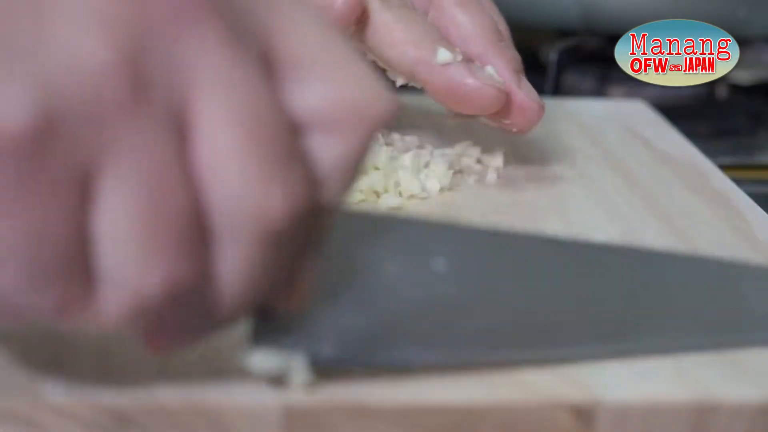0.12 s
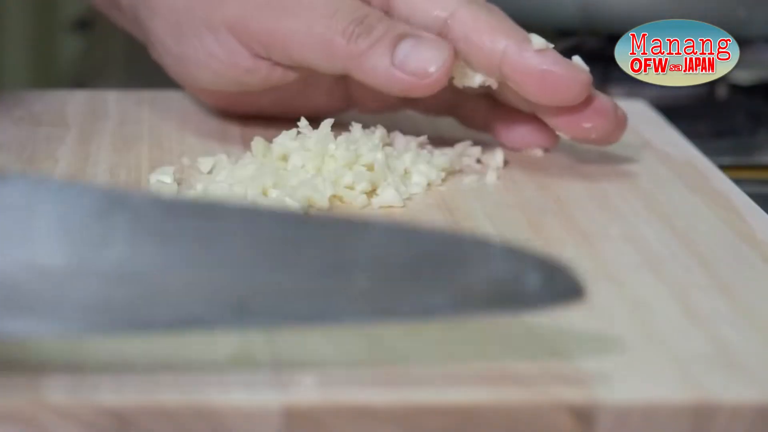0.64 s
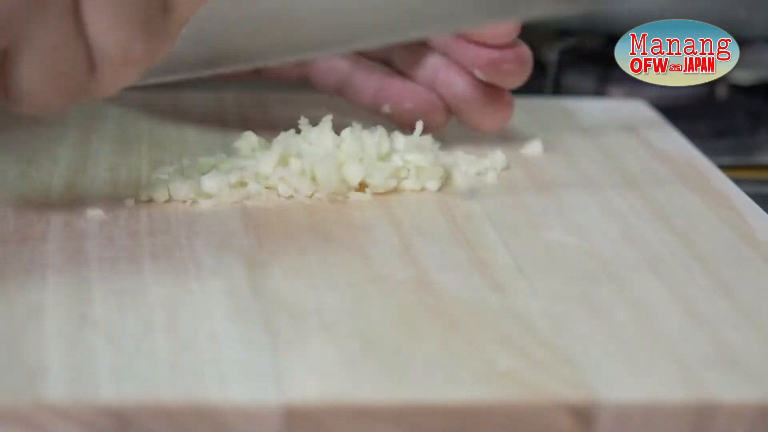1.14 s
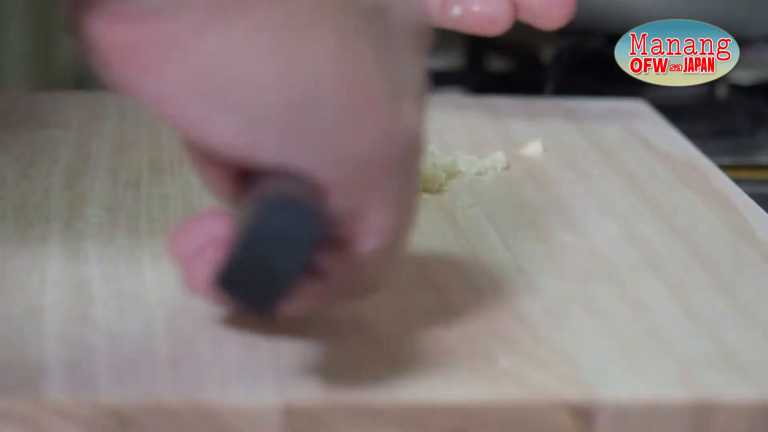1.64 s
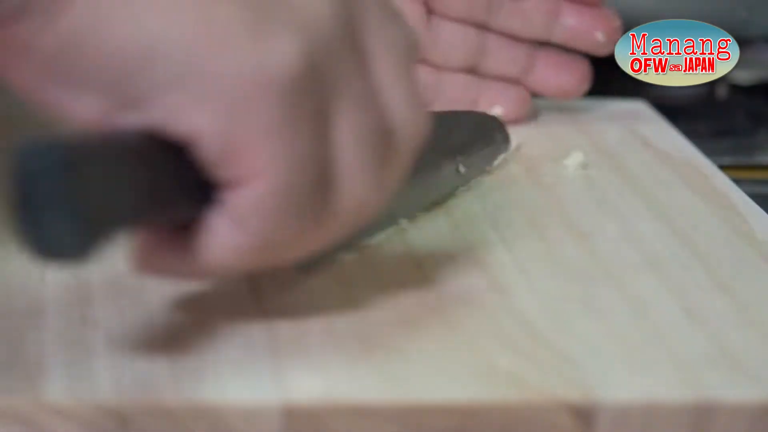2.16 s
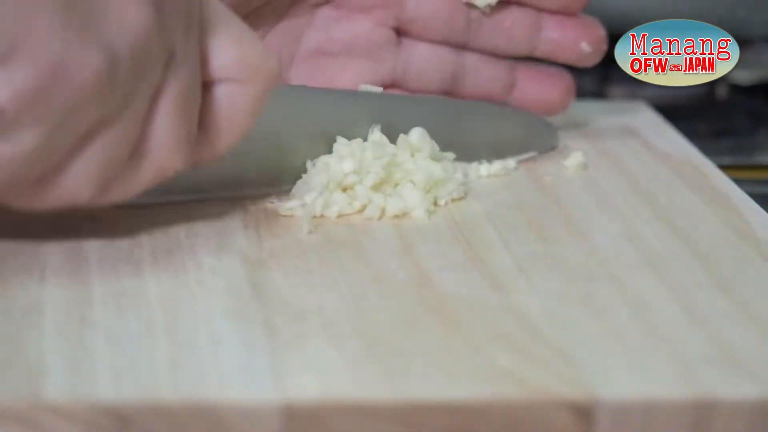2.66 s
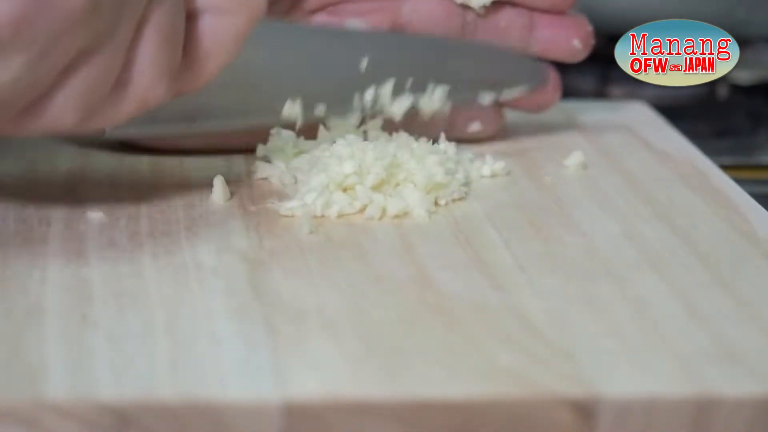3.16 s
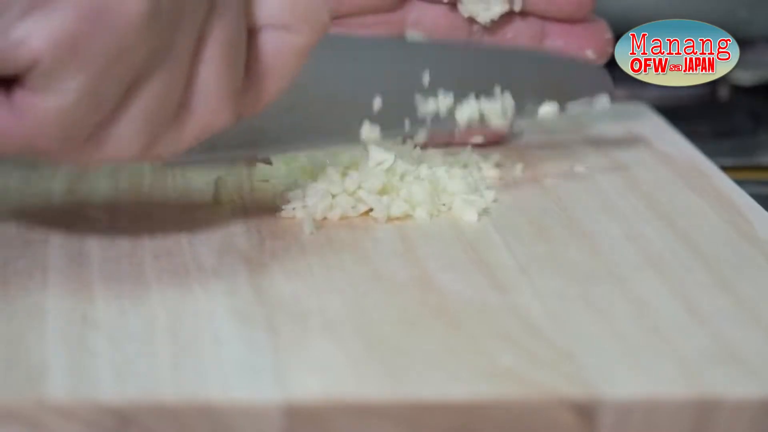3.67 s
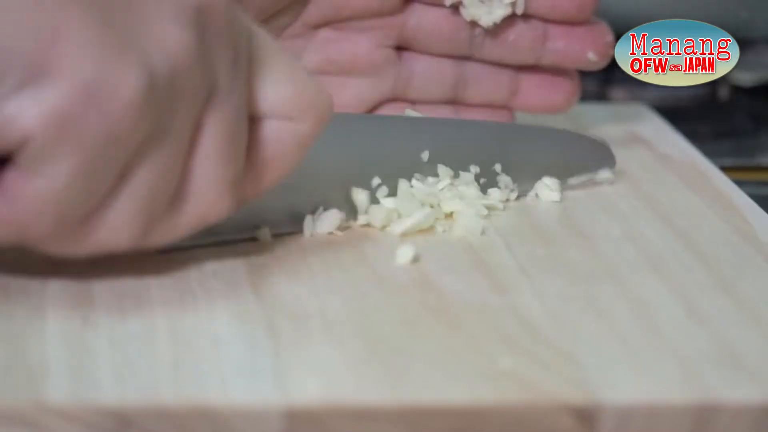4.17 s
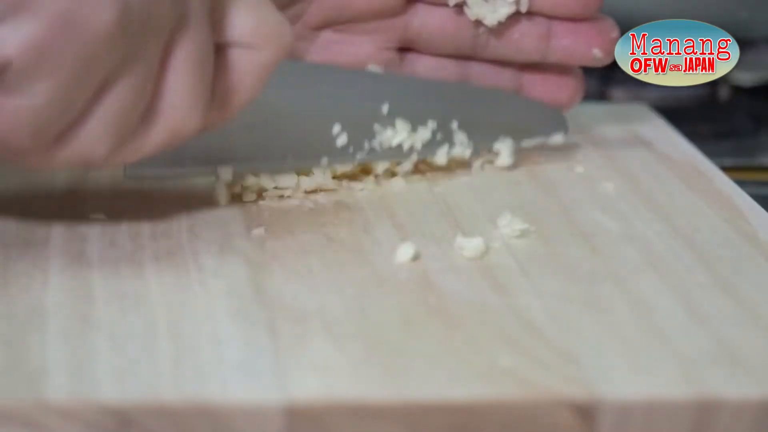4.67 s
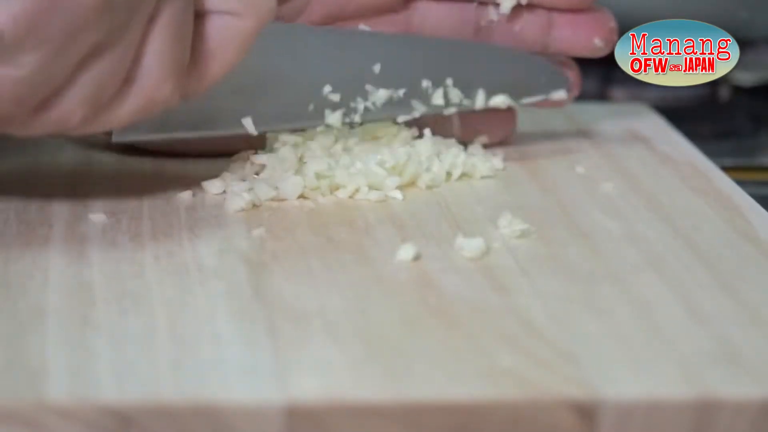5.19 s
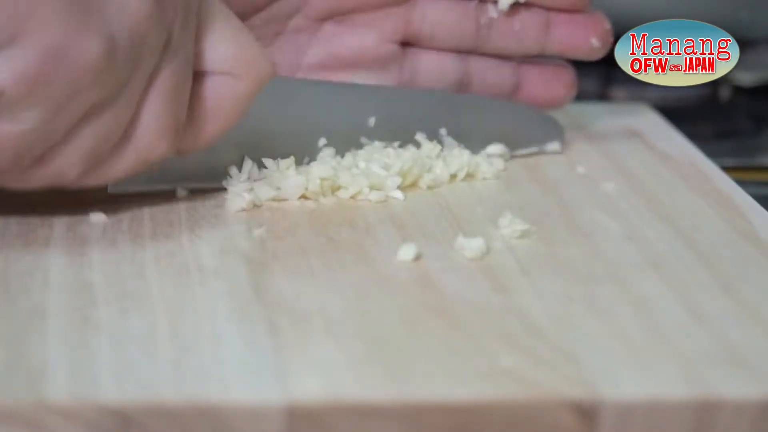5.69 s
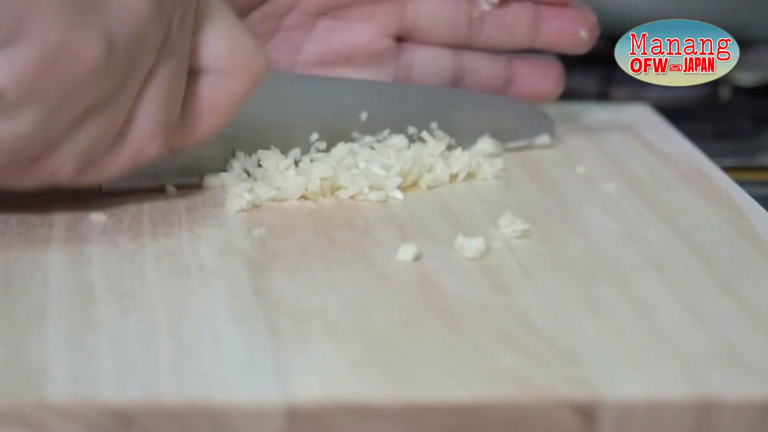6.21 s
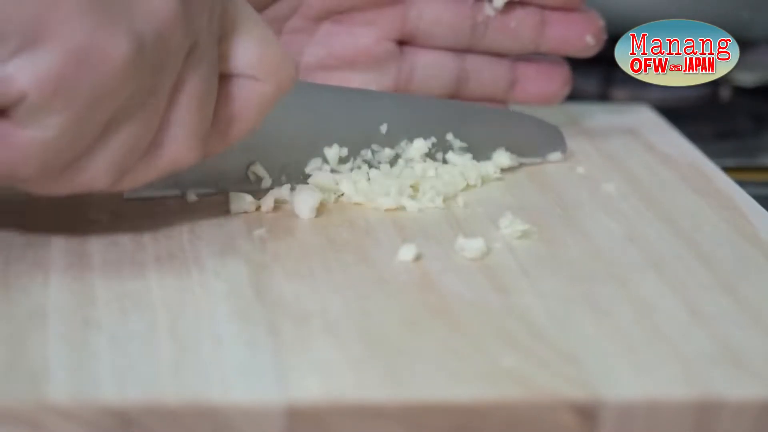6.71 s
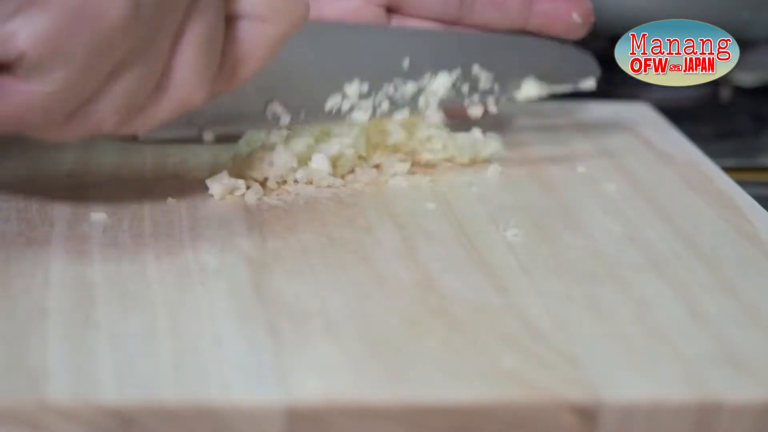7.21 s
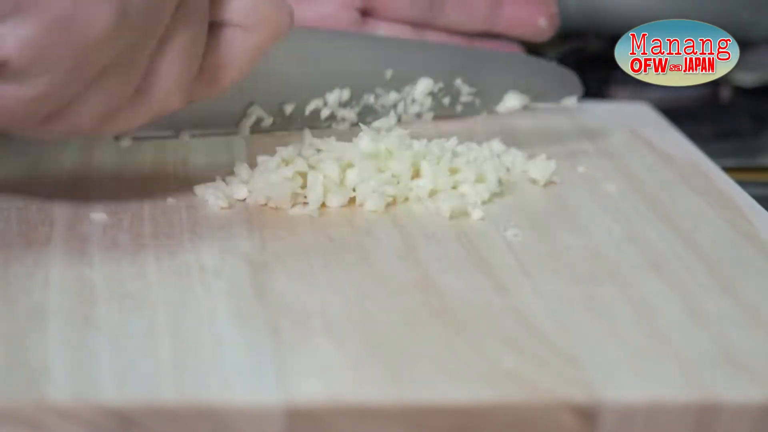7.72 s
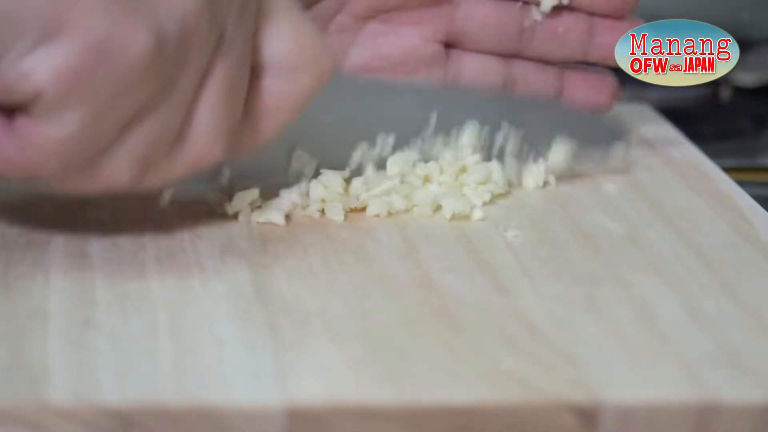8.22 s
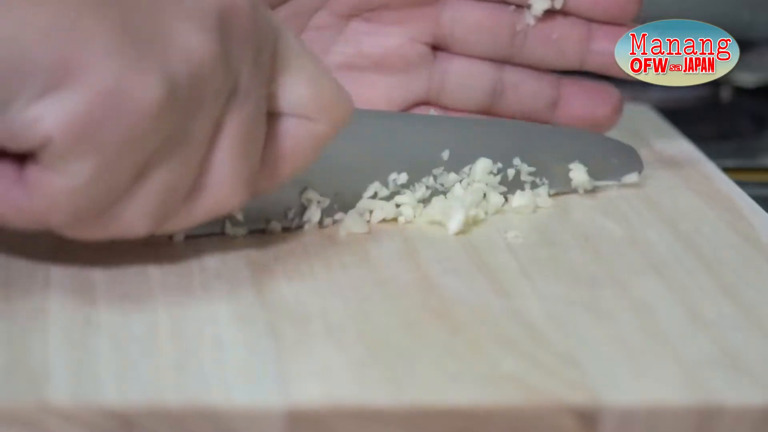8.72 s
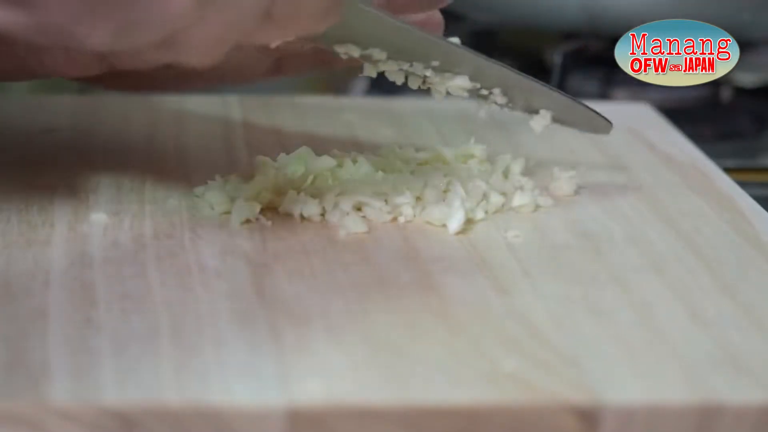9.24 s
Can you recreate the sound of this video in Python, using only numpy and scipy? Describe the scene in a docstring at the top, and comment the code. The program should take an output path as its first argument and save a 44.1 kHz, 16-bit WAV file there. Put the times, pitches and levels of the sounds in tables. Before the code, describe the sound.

Close up in a small hard kitchen, slightly right in the stereo image, a steel knife minces garlic on a thick wooden board. At about 0.15 and 0.8 seconds a moderate knock leads into a long rasping scrape of the edge along the wood. Firmer taps with brief scrapes come at 1.5 and 2.1. From 2.6 chopping runs at four to five strokes a second, each a short gritty slide with a woody knock; sharp loud ones land near 3.05, 3.5 and 3.75. After 4.2 there is a short break with a scrape at 4.5, then brisk chops from 4.9 to 6.65, several hard and bright. Knocks with soft gathering scrapes fall at 7.0 and 7.5. Chopping resumes from 7.9 to 8.8, mostly lighter, with one strong hit near 8.1. Then only quiet hiss and a faint, thin wavering appliance whine remain, present throughout.

```python
"""Mincing garlic on a wooden board

A steel kitchen knife minces garlic on a thick wooden board in a small hard kitchen, heard close up in stereo.
Each chop is a short slide of the edge (noise of tiny slips through blade and board rings) and a knock on
the wood (damped swings that ring the board); longer scrapes of the same slips gather the heap.
An appliance hums faintly behind it all in thin wavering sines, over a bed of shaped noise."""
import sys
import numpy as np
from scipy import signal
from scipy.fft import rfft, irfft, next_fast_len
from scipy.io import wavfile
from scipy.ndimage import uniform_filter1d

SR = 44100
rng = np.random.default_rng(int(sys.argv[2]) if len(sys.argv) > 2 else 0)


def dump(signal):
    """Clip the signal to [-1, 1] and save it as 16-bit WAV at the path in sys.argv[1]."""
    limited = np.clip(np.atleast_2d(signal).T, -1, 1)
    pcm = np.round(limited * 32767).astype(np.int16)
    wavfile.write(sys.argv[1], SR, pcm)


def magnitude_from_level(level_db):
    """Linear magnitude for a level in decibels (20 dB per decade)."""
    exponent = np.asarray(level_db, float) / 20
    return 10 ** exponent


N = 412775


def evened(x):
    """Scales to rms 1."""
    return x / np.sqrt(np.mean(x ** 2) + 1e-20)


def read(points, hz):
    """Reads a table on a log-frequency axis."""
    f, value = np.transpose(points)
    return np.interp(np.log(hz + 1), np.log(f + 1), value)


def add(mix, s, sound):
    """Mixes a stereo sound in at s seconds."""
    part = mix[:, round(s * SR):][:, :sound.shape[1]]
    part += sound[:, :part.shape[1]]


def noise_pair(count, size, likeness, shape_db):
    """Stereo noise from random short-time spectra; shape_db(hz, s) gives the level of each cell."""
    hz, hop = np.fft.rfftfreq(size, 1 / SR), size // 4
    frames = count // hop + 5
    a, b, c, d = rng.standard_normal((frames, len(hz), 4)).T
    same = np.clip(read(likeness, hz), -1, 1)[:, None]
    left = a + 1j * b
    right = same * left + np.sqrt(1 - same ** 2) * (c + 1j * d)
    cells = np.array([left, right])
    cells *= magnitude_from_level(shape_db(hz[:, None], np.arange(frames) * hop / SR))
    return signal.istft(cells, nperseg=size, noverlap=size - hop)[1][:, :count]


# spectral shape of the room tone: (frequency [Hz], relative density [dB per Hz])
ROOM_COLOUR = [(25, -28), (50, -21), (80, -22), (190, -17.5), (300, -20.5), (450, -20), (800, -22),
               (1100, -23.5), (1650, -25), (2100, -32.5), (2700, -27.5), (4500, -34), (5200, -41.5),
               (9000, -38), (15500, -45)]
# stereo width of the room tone: (frequency [Hz], left-right likeness [0 to 1])
ROOM_LIKENESS = [(60, 0.98), (290, 0.47), (640, 0.6), (1400, 0.08), (3000, 0.0082)]
# whine of the appliance: (frequency [Hz], relative level [dB])
APPLIANCE_TONES = [(710.6, -67), (882.9, -68.5), (931.3, -62), (1421, -75), (1663, -70.5), (2449, -86),
                   (2692, -80)]


def room_tone():
    """Smooth air and microphone hiss with a few thin tones that waver in level and phase."""
    colour = lambda hz, s: read(ROOM_COLOUR, hz) + 0 * s
    air = noise_pair(count=N, size=2048, likeness=ROOM_LIKENESS, shape_db=colour)
    tone = magnitude_from_level(-50.5) * evened(air)
    t = np.arange(N) / SR
    for hz, db in APPLIANCE_TONES:
        waver = evened(uniform_filter1d(rng.standard_normal((N, 2)), 3000, axis=0)).T
        level = magnitude_from_level(db + 6 + 1.8 * waver[0])
        tone += level * np.sin(2 * np.pi * hz * t + 0.52 * waver[1])
    return tone


# how long the echoes hang on: (frequency [Hz], t60 [s], held within 0.05 to 0.35)
ECHO_DECAY = [(100, 0.59), (350, 0.21), (700, 0.23), (1840, 0.23), (4000, 0.23), (7000, 0.24),
              (14000, 0.17)]
# stereo width of the echoes: (frequency [Hz], left-right likeness [0 to 1])
ECHO_LIKENESS = [(100, 1), (640, 0.91), (1400, 0.72), (3000, 0.1), (6000, 0.036)]


def kitchen(x, wet_db):
    """Direct sound, a gap, then lumpy echoes that die by band; each touch draws its own echoes."""
    t = np.arange(SR // 3) / SR
    dying = lambda hz, s: -60 * s / np.clip(read(ECHO_DECAY, hz), .05, .35)
    tail = noise_pair(count=len(t), size=256, likeness=ECHO_LIKENESS, shape_db=dying)
    lumps = evened(uniform_filter1d(rng.standard_normal(len(t)), 40))  # near walls arrive as separate slaps
    tail *= magnitude_from_level(9.0 * np.clip(lumps, -2, 1.1) * np.exp(-t / 0.01))
    gap = SR // 280  # samples
    tail = np.pad(tail / np.linalg.norm(tail[0]), ((0, 0), (gap, 0)))
    out = magnitude_from_level(wet_db) * signal.fftconvolve(x[None], tail, axes=1)
    lag = rng.integers(-2, 4)  # samples between the two microphones
    out[0, :len(x)] += np.roll(x, lag)
    out[1, :len(x)] += x
    return out


# ringing modes of the board: (frequency [Hz], relative level before scatter [dB], t60 before the limit [s])
BOARD_MODES = [(218.7, 7, 0.13), (338.6, -2, 0.22), (485.5, 6, 0.048), (643, -5, 0.03),
               (808.5, 13.5, 0.014), (950, -6.5, 0.06), (1113, -2.5, .06), (1401, -6.5, .06),
               (1537, 2.5, .06), (1630, 9, 0.016)]


def board(x):
    """Damped sine modes of the wood, each weighted a little differently at every touch."""
    hz, db, t60 = np.array(BOARD_MODES).T[:, :, None]
    t = np.arange(SR // 4) / SR
    db = db + 3 * rng.standard_normal(db.shape)
    longest = np.clip(60 / hz, .05, .3)  # s; wood damps its high modes fast
    fall_db = db - 60 * t / np.minimum(t60, longest)
    ring = (magnitude_from_level(fall_db) * np.sin(2 * np.pi * hz * t)).sum(0)
    return signal.fftconvolve(x, ring / np.linalg.norm(ring))


# rings of the steel: (frequency [Hz], width [Hz], at least 60, level over the rub before grip [dB], at most 8)
BLADE_RINGS = [(1865, 59, 6), (2360, 48.7, 3.5), (2730, 240, 2), (3560, 200, 3), (4290, 390, 15),
               (6700, 53, -4), (7000, 58, -8), (7890, 33, -5), (9960, 200, -6), (12100, 66, 18),
               (13100, 170, 4), (14500, 52, 7), (15600, 54, 10)]
# friction colour: (frequency [Hz], relative density [dB per Hz])
FRICTION_COLOUR = [(88, -46), (150, -19), (471, 2.5), (877, 1.5), (1040, 13.5), (1240, 7), (1570, 11.5),
                   (2140, -9.5), (2810, -6), (5650, -27), (7710, -22.5), (15500, -32.5)]
WOOD_HZ, RASP_HZ = 2050, 4800  # board drone below the first, rasp between, hiss above the second


def rub(level_db, rasp_db, wood_db):
    """Dense tiny slips in uneven clumps; they sound the blade's thin rings and, lower down, the board."""
    a, b, c, d = rng.random((len(level_db), 4)).T
    sizes = magnitude_from_level(np.minimum(-2.5 * np.log(b + 1e-6), 9))
    slips = np.sign(a - .5) * sizes * (c < 12000 / SR)  # about 12000 slips a second
    clumps_db = 1.6 * evened(uniform_filter1d(d - .5, 150))  # bits of garlic give way under the edge
    slips *= magnitude_from_level(level_db + clumps_db) * signal.windows.tukey(len(a), .05) / np.std(slips)

    size = next_fast_len(len(a) + 4096)
    hz = np.fft.rfftfreq(size, 1 / SR)
    grip_db = 2 * rng.standard_normal(len(BLADE_RINGS)) - 2  # the hand damps other rings each time
    rings = sum(magnitude_from_level(min(db, 8) + grip) / (1 + 2j * (hz - f) / max(width, 60))
                for (f, width, db), grip in zip(BLADE_RINGS, grip_db))
    colour = magnitude_from_level(read(FRICTION_COLOUR, hz)) * (1 + rings)
    low = 1 / (1 + (hz / WOOD_HZ) ** 12)
    high = 1 / (1 + (RASP_HZ / (hz + 1)) ** 16)

    def band(x, gain):
        """Filters by a spectrum of gains scaled to rms 1."""
        return irfft(rfft(x, size) * gain, size) / np.sqrt(np.mean(abs(gain) ** 2))

    hiss = band(slips, colour * high)
    rasp = band(slips * magnitude_from_level(rasp_db), colour * (1 - low - high))
    drone = band(slips * magnitude_from_level(rasp_db + wood_db), colour * low)
    sound = magnitude_from_level(-12.5) * board(drone)
    sound[:size] += hiss + rasp + drone
    return kitchen(np.pad(magnitude_from_level(-6) * sound, (8, 0)), wet_db=0.63)


# long strokes of the edge along the wood: (start [s], length [s], relative hiss level at the top [dB],
# share of the stroke before the top [0 to 1], drone over rasp [dB])
SCRAPE_STROKES = [(.146, 0.23, -30, 0.67, -5), (.777, 0.3, -30.5, 0.43, -0.2),
                  (1.603, 0.084, -25, 0.24, -1.5), (2.076, 0.12, -33.5, 0.25, .3),
                  (2.24, 0.19, -52.5, 0.73, -7), (4.47, 0.23, -43.5, 0.31, -1), (7.0, 0.22, -45, 0.38, -6),
                  (7.5, 0.21, -49, 0.36, -18), (7.872, 0.073, -41.5, 0.28, 5)]
START_DB, END_DB, LIFT = -12.5, -38, 2.15  # hiss relative to its top at both ends; curve of the lifting blade
STROKE_RASP_DB, RASP_HOLDS = 2.5, 0.11  # rasp over hiss at the top; share of the hiss's fall that the rasp resists


def scrape(s, length, db, top, wood_db):
    """The blade is dragged flat to gather the heap: it speeds up, then slows and lifts."""
    u = np.arange(0, length, 1 / SR) / length
    top = np.clip(top, .1, .9)
    speeding_db = START_DB * (1 - u / top)
    lifting_db = END_DB * (abs(u - top) / (1 - top)) ** LIFT
    under_db = np.where(u < top, speeding_db, lifting_db)
    # the hand's pressure wavers along the stroke
    judder_db = 2.26 * evened(uniform_filter1d(rng.standard_normal(len(u)), size=600))
    return s, rub(db + under_db, STROKE_RASP_DB - RASP_HOLDS * under_db + judder_db, wood_db)


# the edge slides through the garlic: (time [s], relative hiss level [dB],
# rasp over hiss as the edge presses [dB], fade t60 [s])
CHOP_SLIDES = [(2.606, -33, 6, 0.098), (2.854, -31.5, 6, 0.091), (3.049, -33.5, 16.5, 0.061),
               (3.292, -32.5, 7.5, 0.17), (3.518, -32.5, 15.5, 0.12), (3.739, -36, 19, 0.074),
               (3.945, -34, 9.5, 0.13), (4.185, -32.5, 9.5, 0.14), (4.862, -24, 15.5, 0.03),
               (5.061, -26.5, 14, 0.06), (5.267, -36.5, 8.5, 0.17), (5.471, -28.5, 15, 0.071),
               (5.663, -29.5, 4.5, 0.097), (5.863, -38, 8, 0.11), (6.055, -32, 6.5, 0.17),
               (6.23, -33.5, 15.5, 0.06), (6.421, -32, 11, 0.042), (6.633, -34, 12, 0.14),
               (7.893, -34.5, 8, 0.13), (8.062, -32, 12.5, 0.14), (8.259, -35, 8, 0.21),
               (8.461, -35.5, 8, 0.2), (8.665, -31.5, 6, 0.13), (8.818, -41.5, 11, 0.03)]
DESCENT_S, QUICKER_PER_DB = 0.022, 0.11  # time down through the heap at 0 dB rasp, shorter as the edge presses
CUT_WOOD_DB, WOOD_PER_DB = -6, 0.4675  # drone over rasp at 0 dB rasp; harder pressing drones more


def cut(s, db, rasp_db, t60):
    """Friction swells as the edge goes down, then fades as it rocks to rest."""
    t = np.arange(SR // 6) / SR
    rise_s = DESCENT_S * np.exp(-QUICKER_PER_DB * rasp_db)
    above = np.maximum(1 - t / rise_s, 0)  # how far the edge still is from the wood
    level_db = db - 22 * above - 60 * np.maximum(t - rise_s, 0) / t60
    wood_db = CUT_WOOD_DB + WOOD_PER_DB * rasp_db - 14 * above  # the board drones fully once the edge reaches it
    return s, rub(level_db, rasp_db, wood_db)


def wavelet(hz, damping):
    """A soft-starting, quickly damped swing of peak 1; a small source radiates little below its pitch."""
    turns = hz * np.arange(900) / SR
    swing = np.sin(2 * np.pi * turns) * turns * np.exp(-damping * turns)
    swing = signal.sosfilt(signal.butter(3, hz / 2.4, "high", fs=SR, output="sos"), swing)
    return np.pad(swing / abs(swing).max(), (30, 0))


# blade meets board: (time [s], relative blow level [dB], pitch of the blow [Hz], low thump over the blow [dB])
BLADE_KNOCKS = [(0.144, -17, 1070, -16.5), (0.775, -18.5, 704, -27), (1.388, -34.5, 1090, -32),
                (1.52, -13.5, 1640, -25.5), (1.528, -23.5, 685, -25), (1.897, -46, 2660, -30),
                (2.075, -10.5, 1420, -27.5), (2.083, -20, 610, -20), (2.631, -23.5, 610, -10),
                (2.882, -13, 940, -23), (3.054, 1.5, 1237, -45), (3.296, -10.5, 940, -29),
                (3.32, -11.5, 760, -18), (3.524, 1.5, 1230, -62), (3.745, 1.5, 1340, -38),
                (3.948, -19, 2610, -30), (3.981, -11, 520, -31), (4.194, -6.5, 900, -29),
                (4.485, -15.5, 770, -21), (4.866, -1, 1100, -34), (5.062, 3, 1390, -38.5),
                (5.29, -25, 2730, -20), (5.472, 3.5, 1410, -39), (5.676, -18.5, 1380, -21.5),
                (5.691, -7.5, 940, -49), (5.863, -18.5, 1560, -26.5), (6.086, -21, 630, -11),
                (6.237, 1, 1250, -36), (6.431, 0, 1370, -36.5), (6.642, 0.5, 1320, -39),
                (6.99, -6.5, 940, -26), (7.441, -42, 2840, -30), (7.487, -4.5, 1420, -28.5),
                (7.497, -15, 810, -44), (7.905, -19, 1480, -27), (8.075, -1, 1250, -37),
                (8.29, -20.5, 865, -12.5), (8.475, -23.5, 2860, -15), (8.677, -17.5, 2960, -36),
                (8.687, -18.5, 505, -10), (8.823, -35.5, 500, -25)]
TICK_DB, TICK_PER_DB = -17, -.3  # edge tick over a 0 dB blow; lighter blows are more tick
ECHO_DB, ECHO_PER_DB = 2, -0.02  # echo over a 0 dB blow; lighter blows land softer and are more echo


def knock(s, db, hz, thump_db):
    """A short damped blow, a slow push and a sharp tick; they ring the board and fill the room."""
    blow = wavelet(hz, 3.2 * min(1, 1300 / hz) ** 1.8)  # high blows land on steel and ring for more cycles
    push = magnitude_from_level(thump_db) * wavelet(224.5, 3.8)
    tick = magnitude_from_level(TICK_DB + TICK_PER_DB * db) * wavelet(2770, 0.71)
    hit = magnitude_from_level(db) * (blow + push + tick)
    body = magnitude_from_level(-10.5) * board(hit)
    body[:len(hit)] += hit
    return s, kitchen(body, ECHO_DB + ECHO_PER_DB * db)


def scene():
    """Knocks, cuts and scrapes, a little to the right, over the room tone; the knife sounds carry little deep
    bass."""
    knife = np.zeros((2, N))
    for table, sound in ((SCRAPE_STROKES, scrape), (CHOP_SLIDES, cut), (BLADE_KNOCKS, knock)):
        for row in table:
            add(knife, *sound(*row))
    knife = signal.sosfilt(signal.butter(2, 130, "high", fs=SR, output="sos"), knife)
    balance_db = np.array([[-.9], [.9]])  # left, right
    return knife * magnitude_from_level(balance_db) + room_tone()


def roll_off(x):
    """The treble ends steeply here."""
    return signal.sosfilt(signal.butter(12, 16500, fs=SR, output="sos"), x)


def record(dry):
    """Clipping near full scale, a steep treble limit and a small steady offset."""
    edge = signal.firwin(301, 15850, window=("kaiser", 8), fs=SR)
    limited = signal.oaconvolve(np.clip(dry, -.97, .97), edge[None], "same", axes=1)
    finished = limited - .0038
    return roll_off(finished)


dry = scene()
out = record(dry)
dump(out)
```